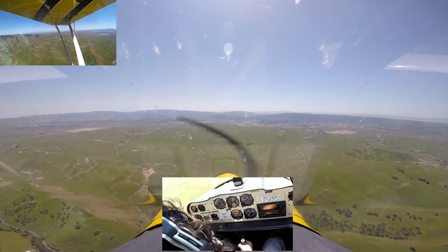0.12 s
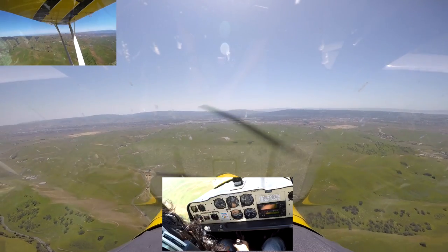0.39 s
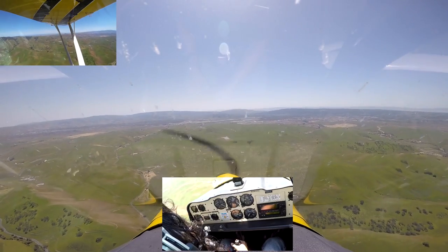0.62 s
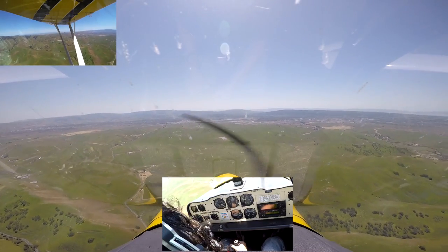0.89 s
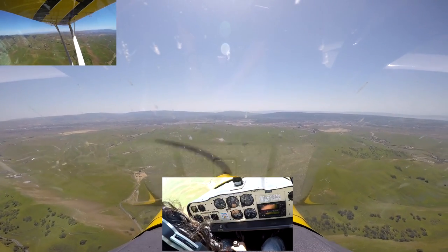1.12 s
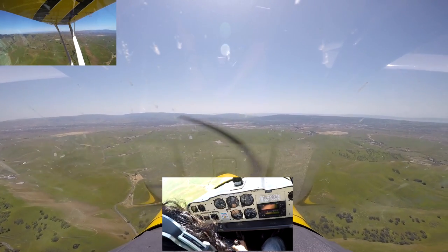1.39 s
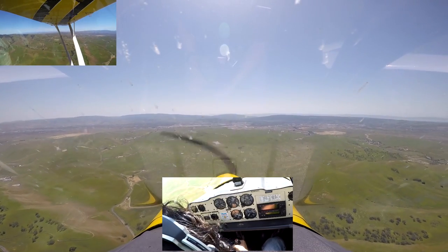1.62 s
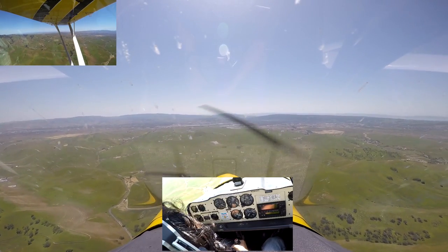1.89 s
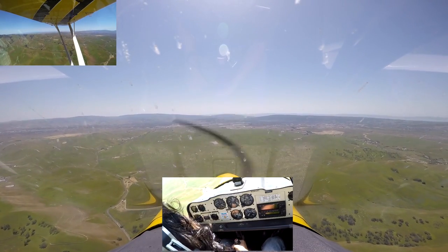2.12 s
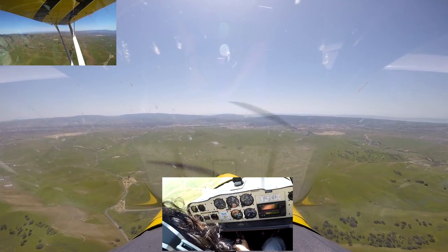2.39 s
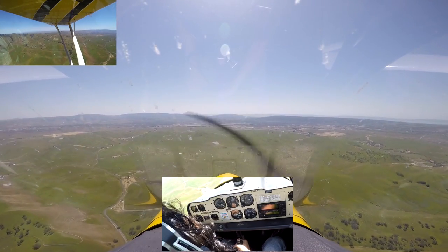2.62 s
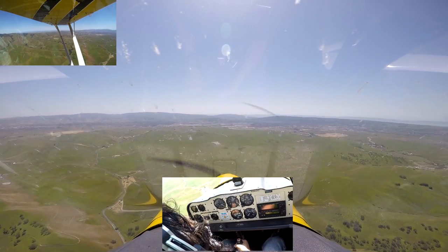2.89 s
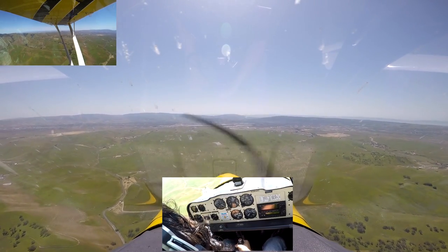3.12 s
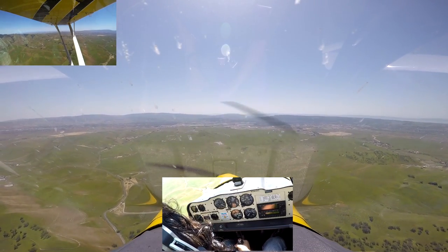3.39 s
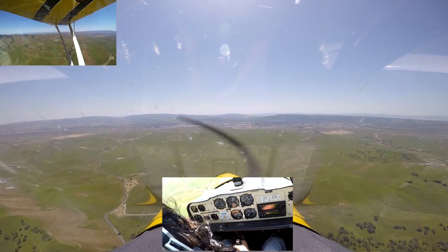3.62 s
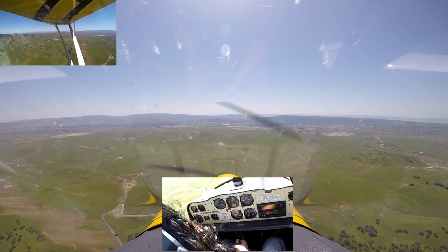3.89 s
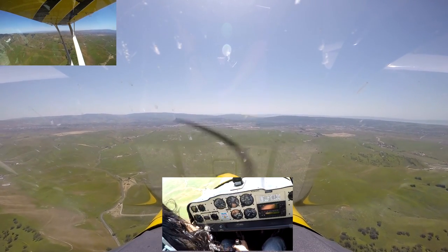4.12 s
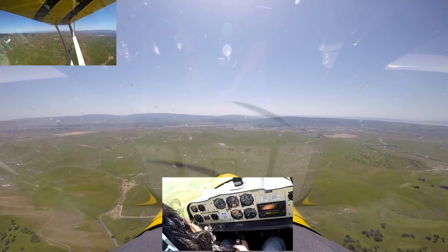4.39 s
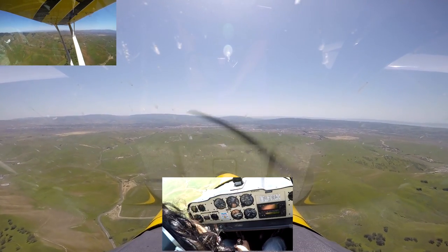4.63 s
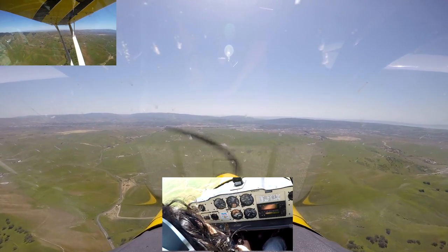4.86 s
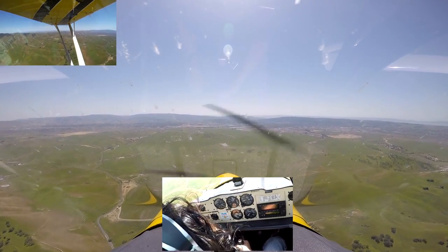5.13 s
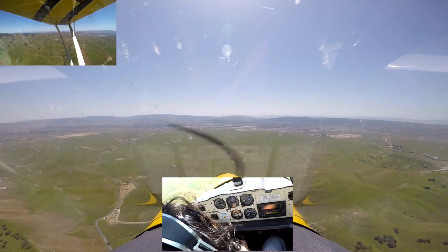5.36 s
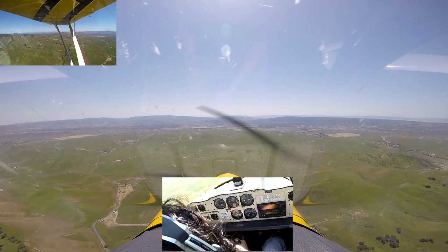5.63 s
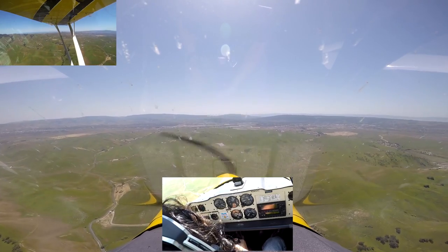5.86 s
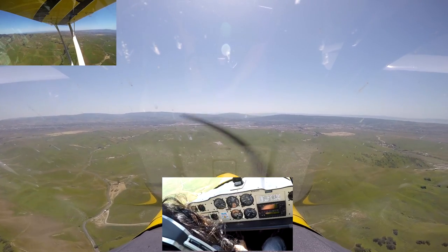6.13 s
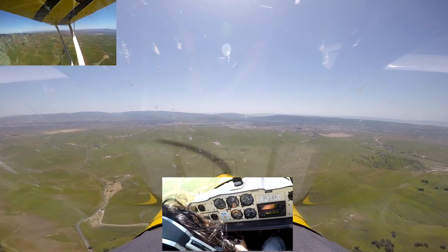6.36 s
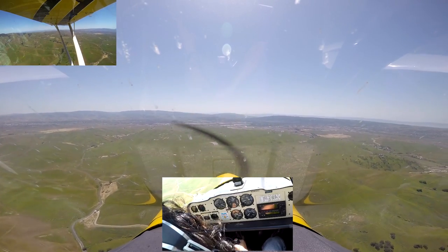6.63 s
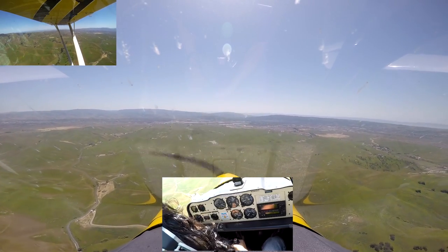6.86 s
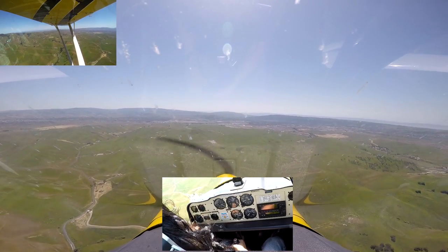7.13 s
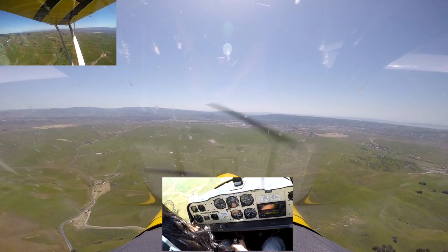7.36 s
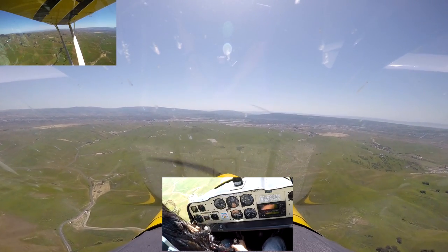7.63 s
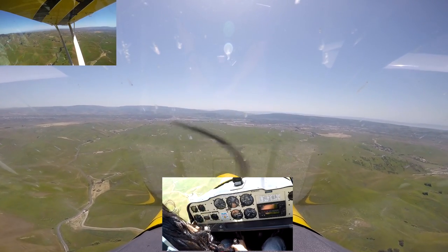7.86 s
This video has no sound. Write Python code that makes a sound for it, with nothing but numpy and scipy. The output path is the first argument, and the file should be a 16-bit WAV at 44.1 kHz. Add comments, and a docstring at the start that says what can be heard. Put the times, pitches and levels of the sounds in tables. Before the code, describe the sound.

From 0 to about 8 seconds, a small piston aircraft flies at steady cruise power, heard from the cockpit through a muffling headset. The engine and propeller make a deep, slightly rough hum around 80 hertz, with a shaft throb an octave below and uneven, buzzing overtones above. A dense, dull roar of slipstream and exhaust surrounds it, strong up to roughly 1 kilohertz and then falling away steeply. The hum is fullest near the start, eases a little around 1.6 to 2.1 seconds, returns by 2.6, softens near 4.3, strengthens around 5.5, and sags slightly after 7 as pitch dips by a hair. These changes are subtle; the impression is constant. A very faint treble hiss and electronic noise sit far beneath. The sound is close, dry and nearly centred, bass barely stronger on the left, already running at the beginning and still running at the end.

```python
"""A deep, muffled engine hum fills the cabin of a small four-cylinder aircraft at cruise power, heard through
one headset line. Shaft shake, firings and two blades are harmonics locked to one slowly drifting speed.
Slipstream and exhaust roar, made of shaped noise, fills the gaps up to a steep ear-cup roll-off.
A faint treble hiss lies above it, and each channel adds its own amplifier noise."""
import sys
import numpy as np
from scipy import signal
from scipy.fft import rfft, irfft
from scipy.io import wavfile
from scipy.ndimage import uniform_filter1d

SR = 44100
rng = np.random.default_rng(int(sys.argv[2]) if len(sys.argv) > 2 else 0)


def materialize(psi):
    """Save the field psi as 16-bit PCM at rate SR to the path in sys.argv[1].

    A 1-D psi becomes a single channel; in a 2-D psi each row is a channel.
    """
    bounded = np.clip(np.atleast_2d(psi).T, -1, 1)
    quanta = np.round(bounded * 32767).astype(np.int16)
    wavfile.write(sys.argv[1], SR, quanta)


N = 352800

# phase leads of the firing harmonics and of the shaft shake
PULSE_SKEW_RAD, SHAKE_LEAD_RAD = -1.6, -1.2


def undb(db):
    """Level to amplitude: 20 dB is a tenfold pressure ratio."""
    return 10 ** (np.asarray(db) / 20)


def walk(rate_hz):
    """Slow random modulation: random levels held 1 / rate_hz s, smoothed twice; spread near 1."""
    hold = int(SR / rate_hz)
    steps = np.repeat(rng.standard_normal(N // hold + 1), hold)
    smooth = uniform_filter1d(uniform_filter1d(steps, hold), hold)
    return 1.53 * smooth[:N]


def coloured(shape, band_hz=(0, SR)):
    """Spectral shaping: white noise weighted to a given density, with unit rms inside the band."""
    hz, density_db = np.transpose(shape)
    bins = np.maximum(np.fft.rfftfreq(N, 1 / SR), 1)
    gain = undb(np.interp(np.log(bins), np.log(hz), density_db))
    spectrum = rfft(rng.standard_normal(N)) * gain
    inside = (bins > band_hz[0]) & (bins < band_hz[1])
    return irfft(spectrum, N) / irfft(spectrum * inside, N).std()


def engine_phase(firing_hz):
    """Phase is the integral of frequency: the firing phase in radians, with a slight random jitter."""
    return 2 * np.pi * np.cumsum(firing_hz) / SR + 0.033 * walk(16)


def tone(cycle, multiple, db, lead=PULSE_SKEW_RAD):
    """Fourier synthesis: one partial of the firing rate at an rms level; a shared lead skews the pulse."""
    return np.sqrt(2) * undb(db) * np.cos(multiple * cycle + lead)


def hum(cycle, firing_db):
    """Harmonic series: shake once a turn, firings and blades twice a turn, partials of uneven cylinders.

    Four cylinders repeat after four firings, so every partial is a multiple of a quarter of the firing rate.
    """
    # weaker partials of the firing rate; polarity is +1 or -1 against the firing pulse:
    # (multiple of firing rate [1], mean level [dB rms], polarity [1])
    partials = [(.75, -47, -1), (1.25, -39.5, 1), (2.25, -50, 1), (2.5, -48, 1), (3, -42.5, 1),
                (3.25, -51, -1), (3.75, -50.5, 1), (4, -46.5, 1), (4.5, -50.5, -1), (5, -40.5, -1),
                (5.25, -49, 1), (6, -49.5, 1), (6.75, -50.5, -1), (7, -41.5, -1), (7.5, -50, 1),
                (8, -52, -1)]
    swell_db = firing_db + 25  # the firing tone swells and sags about -25 dB
    # the shake gains as the firing tone sags; the octave follows the firing tone, more strongly
    shake_db = -27.5 - 0.38 * swell_db - 0.24 * walk(3)
    octave_db = -32 + 1.7 * swell_db + 1.54 * walk(4)

    out = tone(cycle, 0.5, shake_db, SHAKE_LEAD_RAD)
    # the shake is peaked, so its third harmonic rides on its crest
    out += tone(cycle, 1.5, shake_db - 13, 3 * SHAKE_LEAD_RAD)
    out += tone(cycle, 1, firing_db + 0.5 * walk(7.3))
    out += tone(cycle, 2, octave_db)
    for multiple, db, polarity in partials:
        # the airframe path shifts a little all the time, more so for short waves
        shifted_cycle = cycle + 0.023 * walk(4)
        wandering_db = db + 1.7 * walk(3.3)
        out += polarity * tone(shifted_cycle, multiple, wandering_db)
    return out


def roar(cycle):
    """Amplitude-modulated noise: slipstream and exhaust, nudged by every firing and every shaft turn."""
    # density after hull and ear cup: (frequency [Hz], relative density [dB per Hz])
    roar_shape = [(9, -24), (25, -1.5), (65, 1.5), (135, -1.5), (165, -2), (210, -6), (300, -3), (340, -5),
                  (420, -2), (510, -5), (610, -3.5), (790, -3.5), (825, -8), (1050, -11), (1200, -19),
                  (1320, -27), (1800, -39), (2600, -60)]
    level_db = -29 - 0.01 * walk(3)
    firing_throb_db = 0.26 * np.cos(cycle + 1.3)
    shaft_throb_db = 0.43 * np.cos(cycle / 2 + 1.9)
    noise = coloured(roar_shape, (150, 1200))  # the level holds for this band in Hz
    return undb(level_db + firing_throb_db + shaft_throb_db) * noise


def hiss():
    """Stationary noise with a slight level drift: treble hiss common to both channels."""
    # (frequency [Hz], relative density [dB per Hz])
    hiss_shape = [(800, -11.5), (1800, -2), (2950, 0.5), (3500, -2), (4800, -2), (5700, 0), (6500, -5.5),
                  (8000, -15), (11000, -20), (13000, -24.5), (15000, -30), (15400, -44.5)]
    return undb(-61 + 0.27 * walk(5)) * coloured(hiss_shape)


def amplifier_noise():
    """Incoherent noise: an independent draw for each channel at -73 dB rms."""
    # (frequency [Hz], relative density [dB per Hz])
    noise_shape = [(1200, -17), (1900, 1), (6300, -3), (7500, -15.5), (12000, -23.5), (16000, -40.5)]
    return undb(-73) * np.array([coloured(noise_shape), coloured(noise_shape)])


def channel_imbalance(dry):
    """Frequency-dependent gain: the change that makes left stronger, fully in the bass, half above it."""
    balance_db, bass_hz = 0.42, 185  # left minus right in the bass; upper edge of the bass
    lowpass = signal.butter(N=6, Wn=bass_hz, fs=SR, output="sos")
    bass = signal.sosfiltfilt(lowpass, dry)
    gain_change = undb(np.array([[balance_db], [-balance_db]]) / 2) - 1
    return gain_change * (bass + 0.5 * (dry - bass))


def scene():
    """Superposition: hum, roar and hiss add on one line that feeds both channels."""
    # engine at cruise: (time [s], firing rate [Hz], firing tone level [dB rms])
    cruise = [(0.5, 79.53, -24), (1.1, 79.82, -24.5), (1.6, 80.27, -26), (2.1, 80.2, -26),
              (2.6, 80.14, -24.5), (3.2, 79.77, -24.5), (3.8, 79.7, -25.5), (4.3, 80.17, -26),
              (4.9, 80.35, -25), (5.5, 79.6, -24), (6.1, 79.77, -24.5), (6.7, 79.8, -25.5),
              (7.2, 79.32, -27), (7.7, 79.3, -26.5)]
    s, rate_hz, level_db = np.transpose(cruise)
    time = np.arange(N) / SR
    cycle = engine_phase(np.interp(time, s, rate_hz))
    firing_db = np.interp(time, s, level_db)
    line = hum(cycle, firing_db) + roar(cycle) + hiss()
    return np.array([line, line])


def band_limit(x):
    """A steep low-pass at the top of the band."""
    return signal.sosfilt(signal.butter(12, 15250, fs=SR, output="sos"), x)


def record(dry):
    """Linear inputs: unequal gains, independent noise and a constant offset add to the sound."""
    # each input rests above zero, one row a channel: (offset [full scale])
    offset = [
        [0.0406],
        [0.0917],
    ]
    mix = dry + channel_imbalance(dry) + amplifier_noise() + np.array(offset)
    return band_limit(mix)


dry = scene()
out = record(dry)
materialize(out)
```